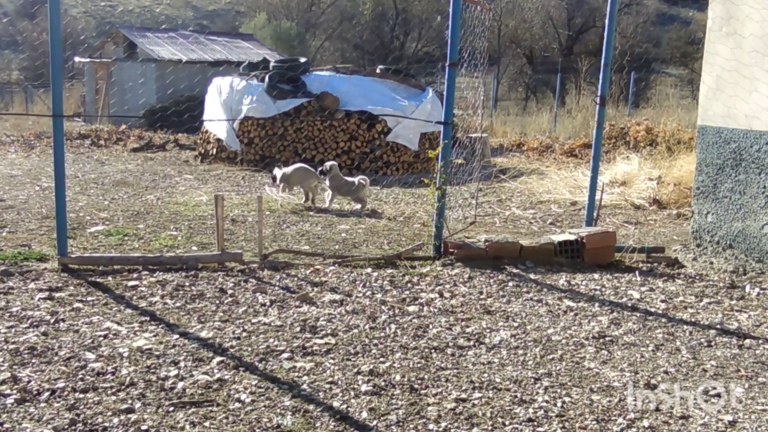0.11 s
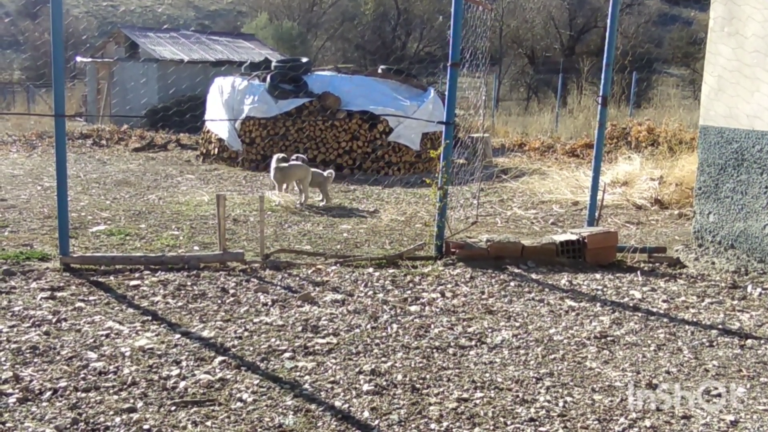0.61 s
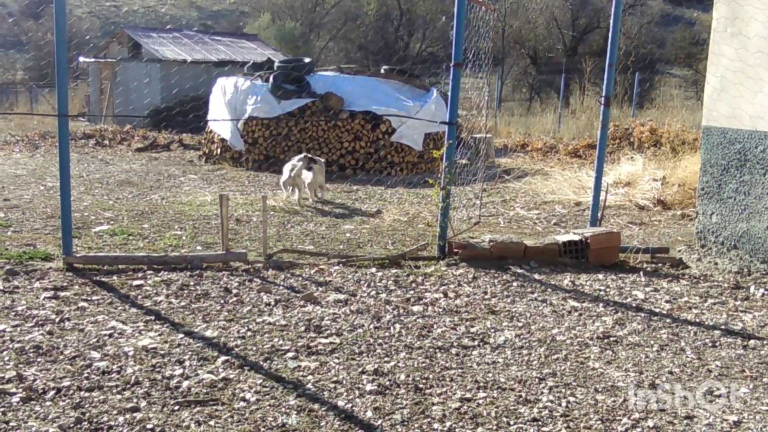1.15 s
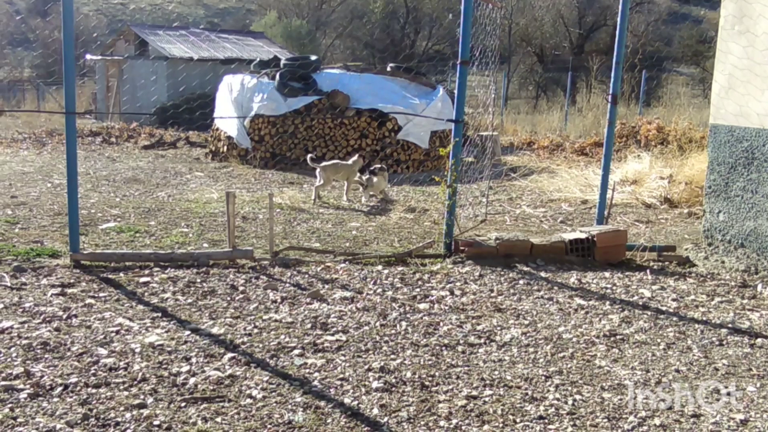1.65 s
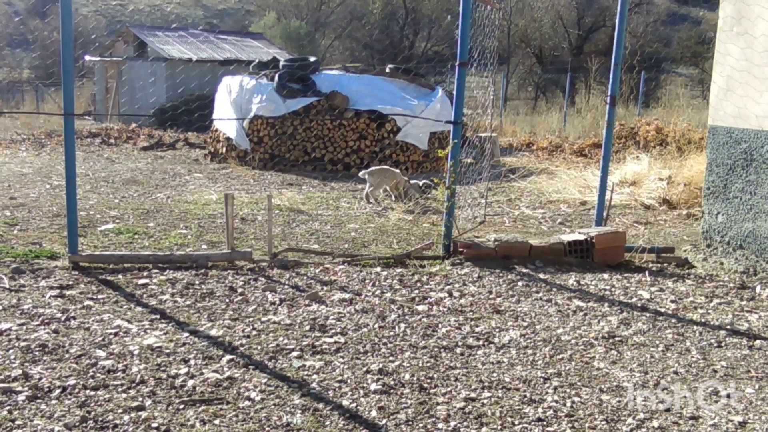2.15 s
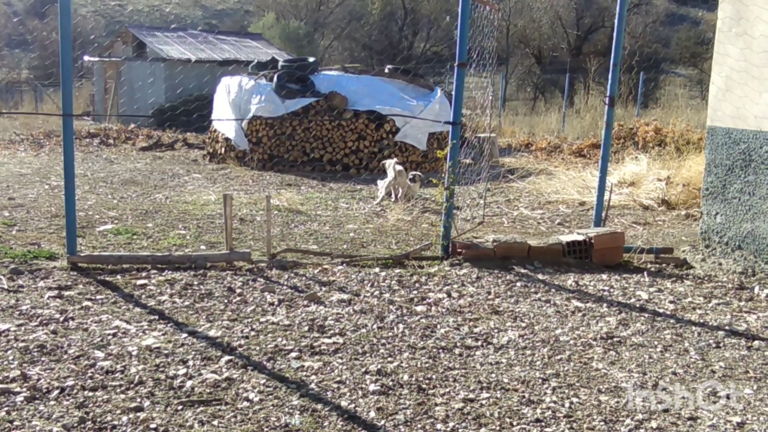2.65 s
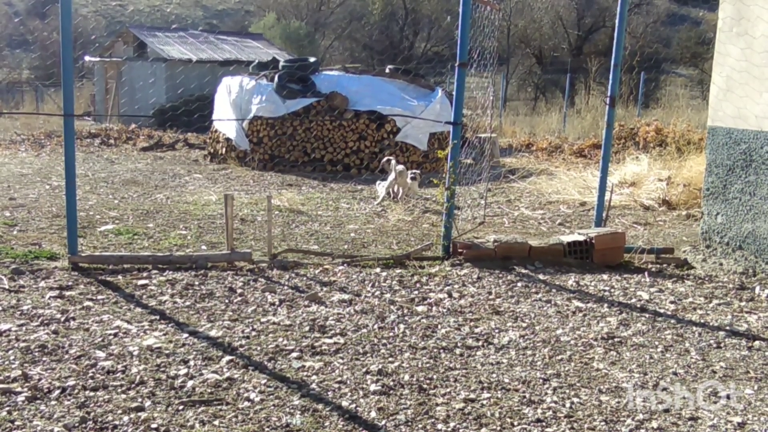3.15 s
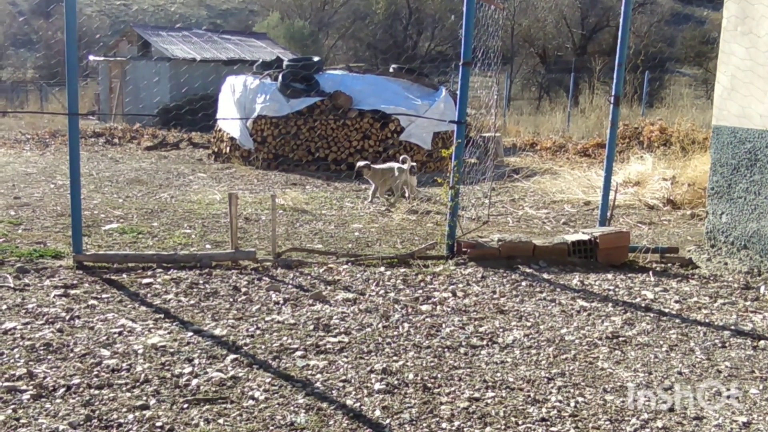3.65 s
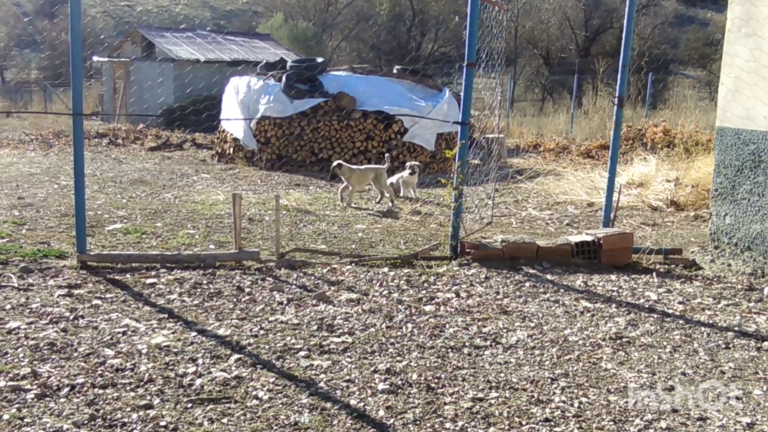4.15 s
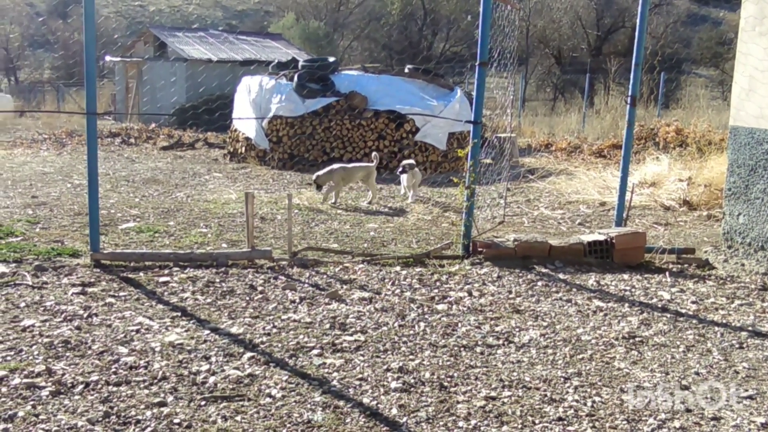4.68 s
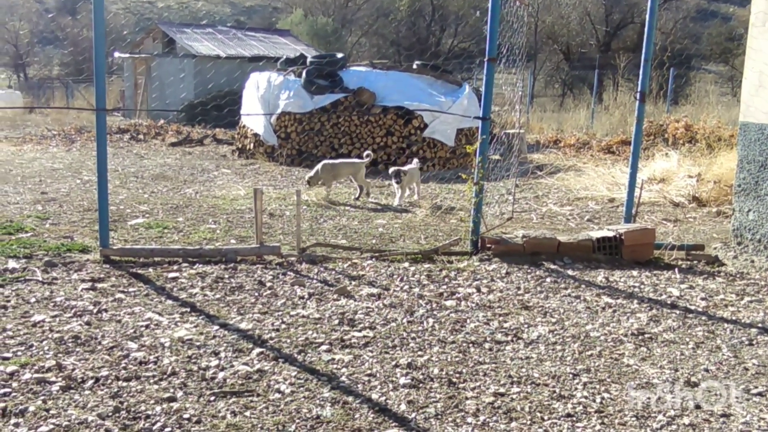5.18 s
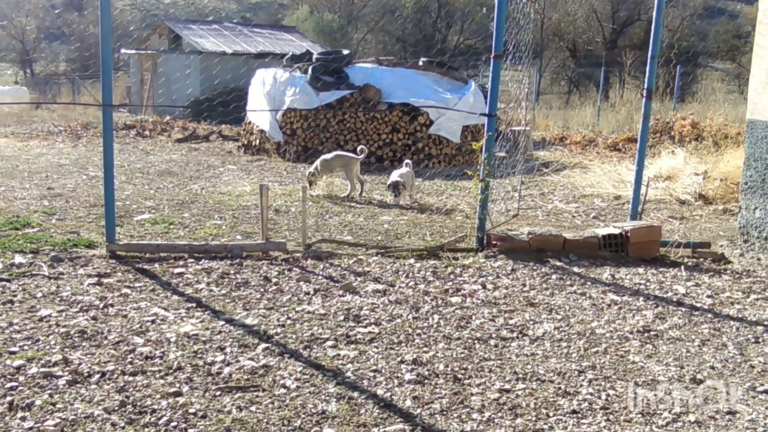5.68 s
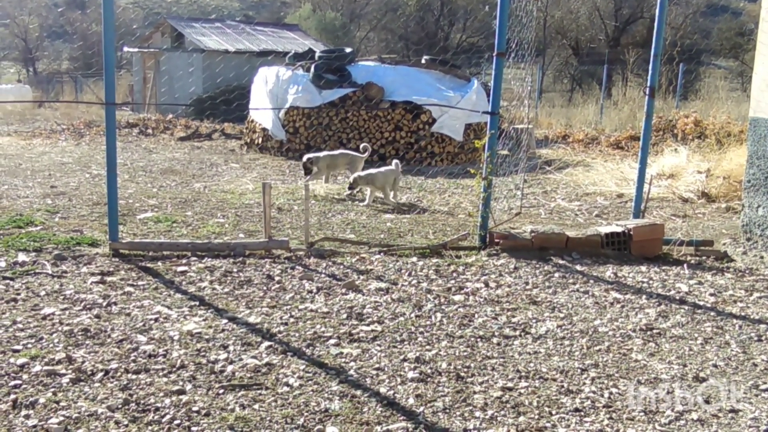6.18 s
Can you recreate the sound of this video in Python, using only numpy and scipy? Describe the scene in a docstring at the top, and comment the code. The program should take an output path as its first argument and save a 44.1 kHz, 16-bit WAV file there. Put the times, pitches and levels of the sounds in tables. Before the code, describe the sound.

An open yard heard in stereo from some metres away, with quiet hush, faint hiss, soft low wind and very short echoes. At 0-0.3 s a hoarse puppy growl starts amid dry litter crackles and snapping twigs, mostly to the left. Lower, weaker growls follow at 0.4-0.8 and 0.9-1.45 s. At 1.5 s comes one very short, loud, harsh yap. From 1.7 to 2.8 s the snarling is roughest and loudest, pulsing in bursts with hard throaty slaps, busy paws and bright snaps. It sinks to a low growl, gone by 3.2 s. Then there are brief faint grumbles, a clear snap at 3.55 s, scattered ticks and a wind bump at 4.5 s. A tiny falling chirp at 4.95 s precedes a downward-sliding insect hiss at 5.2 s. At 5.9 s a hard object bounces rapidly, with hollow scraping, renewed scuffling and soft grumbles to 6.3 s.

```python
"""An open yard with dry wood chips on the ground: two puppies wrestle some metres from a pair of microphone ports.
Low growls and one sharp yap are voiced by pulses, overtones and breath that ring resonances of the body.
Paws scuffle in the litter as dense random cracks; twigs snap, a hard thing bounces, something scrapes.
Then they calm down to faint grumbles and a few snaps, with an insect's sliding hiss, a bird's falling chirp and
light wind made of filtered noise. Dogs and single ground sounds also echo through the yard."""
import sys
import numpy as np
from scipy import signal
from scipy.fft import rfft, irfft, next_fast_len
from scipy.io import wavfile
from scipy.ndimage import uniform_filter1d

SR = 44100
rng = np.random.default_rng(int(sys.argv[2]) if len(sys.argv) > 2 else 0)


def master_out(mix):
    """Clip the mix to full scale and print it as 16-bit PCM to the path in sys.argv[1]."""
    frames = np.transpose(np.atleast_2d(mix))
    ceiling = np.clip(frames, -1, 1)
    pcm = np.round(ceiling * 32767).astype(np.int16)
    wavfile.write(sys.argv[1], SR, pcm)


def volts(x):
    """Linear amplitude factor 10**(x/20) for a level x in dB, scalar or array-like."""
    e = np.asarray(x, float) / 20
    return 10 ** e


N = 278006


def evened(x):
    """Normalization: scales a signal to rms 1."""
    return x / np.sqrt(np.mean(x ** 2) + 1e-20)


def read(points, hz):
    """Spectral envelope: interpolates a table on a log-frequency axis."""
    f, value = np.transpose(points)
    return np.interp(np.log(hz + 1), np.log(f + 1), value)


def curve(rows):
    """Control envelope: first sample of a timed table and its columns interpolated at audio rate."""
    s, *columns = np.transpose(rows)
    first = max(round(s[0] * SR), 0)
    end = min(round(s[-1] * SR), N)
    t = np.arange(first, end) / SR
    return round(t[0] * SR), [np.interp(t, s, c) for c in columns]


def add(mix, at, sound):
    """Superposition: mixes a sound in, in place, from sample at."""
    part = mix[..., at:at + sound.shape[-1]]
    part += sound[..., :part.shape[-1]]


def resonate(x, hz, width):
    """Heterodyne resonance: shifts hz down to zero, smooths twice, shifts back; its gain is 1."""
    turn = np.exp(2j * np.pi * np.cumsum(hz * np.ones(x.shape[-1])) / SR)
    r = np.exp(-np.pi * width / SR)
    return 2 * (turn * signal.lfilter([(1 - r) ** 2], [1, -2 * r, r ** 2], x / turn)).real


def colour(x, gain):
    """Linear filtering: multiplies the spectrum by a function of frequency."""
    size = next_fast_len(x.shape[-1])
    spectrum = rfft(x, size) * gain(np.fft.rfftfreq(size, 1 / SR))
    return irfft(spectrum, size)[..., :x.shape[-1]]


def wobble(size, hz):
    """Low-passed noise: a random drift of rms 1, about hz turns a second."""
    span = int(SR / hz / 2)
    return evened(uniform_filter1d(uniform_filter1d(rng.standard_normal(size), span), span))


def cavity(x, modes, hz=1):
    """Parallel resonances: a few modes (frequency, width_hz, level_db), shifted together by hz."""
    return evened(sum(volts(db) * resonate(x, f * hz, width) for f, width, db in modes))


def swell(t, peak_s, db, rise_s, fall_s):
    """Exponential envelope: level in dB that gains 10 dB in each rise_s and loses 10 dB in each fall_s."""
    return db - 10 * np.maximum((peak_s - t) / max(rise_s, .002), (t - peak_s) / max(fall_s, .002))


def loudest(levels_db):
    """Incoherent summation: adds levels as powers."""
    return 10 * np.log10(sum(volts(db) ** 2 for db in levels_db))


# effort and mouth movement, a list per growl: time_s, chest_level_db, mouth_opening (0-1), mouth_hz
GROWL_MOTION = [
    [(0.0, -43, 0.56, 950), (0.07, -46.5, 0.46, 1010), (0.11, -54.5, 0.53, 970), (0.18, -54.5, .48, 1110),
     (0.26, -72, 0.84, 1070)],
    [(0.42, -64, 0.6, 840), (0.46, -49.5, 0.12, 800), (0.56, -54, 0.39, 762), (0.612, -46.5, 0.45, 750),
     (0.73, -57.5, .33, 790), (0.78, -71, 0.7, 790)],
    [(0.92, -75, 0.76, 880), (0.99, -60, 0.55, 830), (1.02, -68, 0.28, 842), (1.085, -56, 0.5, 887),
     (1.118, -51, 0.81, 980), (1.166, -51, 0.61, 800), (1.258, -53.5, 0.98, 1073), (1.364, -58, 0.73, 997),
     (1.44, -52, 0.51, 1000), (1.47, -59.5, 0.5, 996)],
    [(1.45, -62.5, .01, 900), (1.494, -47, .01, 900), (1.566, -52.5, .01, 900), (1.6, -63, 0.08, 900),
     (1.68, -57, 0.2, 900), (1.71, -73, .01, 900)],
    [(1.69, -61.5, 1, 940), (1.71, -63, 1, 1050), (1.778, -41.5, 0.79, 893), (1.864, -41, 0.8, 767),
     (1.93, -43.5, 0.75, 910), (1.962, -43, 0.68, 1010), (2.01, -49.5, 0.36, 930)],
    [(2.0, -62, 0.5, 944), (2.026, -45, 0.76, 970), (2.058, -47, 0.84, 910), (2.092, -46.5, 0.76, 1174),
     (2.142, -49.5, 0.62, 960), (2.164, -57, 0.89, 905), (2.23, -65, 0.76, 860)],
    [(2.25, -46, 0.5, 920), (2.322, -46, 0.82, 924), (2.352, -42.5, 0.7, 885), (2.442, -44.5, 0.8, 930),
     (2.472, -41.5, 0.59, 950), (2.682, -47, 0.72, 920), (2.704, -43, 0.62, 860), (2.764, -50, 0.77, 890),
     (2.83, -57, 0.47, 900)],
    [(2.81, -46.5, 0.57, 875), (2.92, -49.5, 0.61, 860), (3.018, -57.5, 0.31, 844), (3.132, -52, .42, 876),
     (3.16, -61, 0.04, 860), (3.24, -79, 0.2, 853)],
    [(3.43, -70, .45, 770), (3.47, -65.5, 0.33, 790), (3.5, -66.5, 0.3, 760), (3.54, -85.5, .6, 780)],
    [(4.03, -77.5, 0.28, 800), (4.098, -65.5, 0.37, 750), (4.15, -85, .6, 730)],
    [(4.21, -72, .1, 750), (4.3, -63.5, 0.43, 830), (4.354, -69.5, 0.2, 782), (4.4, -69.5, .42, 786)],
]
# the folds, one row a growl: start_pitch_hz, end_pitch_hz, start_roughness, end_roughness (0 clear, 1 hoarse)
FOLDS = [(182, 170, .5, .58), (118, 108, .42, .34), (108, 112, .12, .45), (115, 115, .5, .5),
         (165, 180, .62, .62), (158, 136, .5, .58), (142, 130, .48, .4), (115, 111, .26, .08),
         (97, 90, .4, .3), (166, 163, .04, .04), (148, 138, .2, .2)]
# the tract, one row a growl: chest_hz, throat_hz, throat_above_chest_db, teeth_above_mouth_db
TRACTS = [(250, 477, -4, -4.5), (230, 507, -12.5, -6), (226, 467, -11, -1), (220, 240, 0.5, 0.5),
          (220, 440, -7, -8), (220, 474, -10, -5), (220, 435, -4, -8), (227, 410, -6.5, -7),
          (183, 440, -3, -4), (200, 533, 4.5, -2), (170, 305, 2.5, 4)]
# chest resonances: factor_on_chest_hz, width_hz, level_db
CHEST_MODES = [(.9, 170, 27.5), (1.4, 200, -8)]
# mouth resonances: factor_on_mouth_hz, width_hz, level_db
MOUTH_MODES = [(0.99, 330, 7.5), (1.5, 180, -3), (0.5, 120, 1), (.7, 240, -2.5)]
# resonances at the teeth: frequency_hz, width_hz, level_db
TEETH_MODES = [(2230, 910, 10), (1740, 1000, -2.5), (3130, 1900, -4.5)]
MOUTH_SHUT_DB, MOUTH_OPEN_DB = -30.5, 5.5  # the mouth's ring above the chest
PITCH_WAVER = .06  # rms share of the pitch at roughness 1


def growl(rows, start_hz, end_hz, rough_start, rough_end, chest_hz, throat_hz, throat_db, bared_db):
    """Source-filter principle: slack folds slap unevenly; chest, throat, mouth and teeth ring with each slap."""
    at, (chest_db, opening, mouth_hz) = curve(rows)
    size = len(chest_db)
    rough = np.linspace(rough_start, rough_end, size)
    hz = np.linspace(start_hz, end_hz, size) * (1 + PITCH_WAVER * rough * wobble(size, 12))
    mouth_db = MOUTH_SHUT_DB + (MOUTH_OPEN_DB - MOUTH_SHUT_DB) * opening
    jitter = np.clip(1 + .36 * rough * wobble(size, 90), .3, 3)
    turns = np.cumsum(hz * jitter) / SR
    strength = volts(6 * rough * rng.standard_normal(size).clip(-2, 2))
    slaps = evened(np.diff(np.floor(turns), prepend=0) * strength)
    # breath bursts out at each opening
    puffs = rough * evened(np.exp(-(turns % 1) / 2.4) * rng.standard_normal(size))
    flap = volts(4.6 * rough * wobble(size, 71))  # loose lips and cheeks flutter
    deep = np.sqrt(flap) * (slaps + 1.0 * puffs)
    hoarse = flap * (slaps + 3.0 * puffs)
    throat = volts(throat_db) * evened(resonate(deep, throat_hz, 200))
    low = cavity(deep, CHEST_MODES, chest_hz) - throat  # in opposite polarity
    voice = evened(low) + volts(mouth_db) * cavity(deep + hoarse, MOUTH_MODES, mouth_hz)
    voice += volts(mouth_db + bared_db) * cavity(hoarse, TEETH_MODES)  # breath is harshest at the teeth
    # a small body radiates no deep bass
    voice = colour(voice, lambda f: 1 / np.hypot(1, (122 / (f + 1)) ** 4))
    return at, volts(chest_db) * voice * signal.windows.tukey(size, .04)


# single slaps that stand out of the growls: start_s, level_db (mouth ring before its decay), ringing_hz
SINGLE_SLAPS = [(1.728, -36, 980), (1.745, -37, 920), (1.798, -33, 935), (1.835, -27.5, 787),
                (1.851, -30, 767), (2.355, -34, 977), (2.462, -31, 870), (2.511, -41.5, 900),
                (2.566, -40.5, 1003), (2.65, -44, 920), (2.825, -46, 906)]


def hard_slaps():
    """Impulse response: each slap rings the mouth for a few cycles and thumps the throat."""
    out, t = np.zeros(N), np.arange(1500) / SR
    for s, db, hz in SINGLE_SLAPS:
        mouth = np.sin(2 * np.pi * hz * t) * np.exp(-t / 0.0081)
        throat = .5 * np.sin(2 * np.pi * 330 * t) * np.exp(-t / 0.0054)
        add(out, round(s * SR), volts(db) * (mouth + throat) * np.minimum(t / 0.0012, 1))
    return out


# time_s, voice_level_db, squeal_share (0-1), squeal_hz
YAP_MOTION = [(1.468, -56.5, 1, 1043), (1.485, -36, 0.54, 1151), (1.495, -30, 1, 1055),
              (1.505, -18, 0.77, 971.5), (1.518, -21, .09, 995.5), (1.532, -17, .05, 1159),
              (1.543, -20.5, 0.5, 1121), (1.556, -22.5, .74, 913), (1.566, -32.5, 0.82, 976),
              (1.59, -58.5, 0.9, 928)]
# spectral envelope of overtones and breath: frequency_hz, level_db
YAP_TRACT = [(150, -66), (250, -14.5), (579, -10), (901, -3), (1500, -17.5), (2290, -16), (2690, -18),
             (3050, -29), (3930, -41), (4750, -54), (5930, -57.5), (8950, -36.5), (11000, -59),
             (14300, -86.5), (22000, -120)]
# breath: peak_level_db, rise_db_per_s, sag_db_per_s, further_fall_after_the_end_db_per_s
YAP_BREATH = (-28.5, 1098.5, 110, 500)
BREATH_PEAK_S, BREATH_END_S = 1.496, 1.566
YAP_START_HZ, YAP_HOLD_HZ, YAP_RISE_S = 257, 293.3, .03  # the pitch climbs and settles
YAP_SHIMMER_DB = 4.5  # rms; each overtone flickers on its own


def yap():
    """Biphonation: overtones without their fundamental, an unrelated squeal near 1 kHz, and harsh breath."""
    at, (effort_db, share, squeal_hz) = curve(YAP_MOTION)
    share = np.clip(share, 0, 1)
    size = len(share)
    t = np.arange(size) / SR
    hz = YAP_HOLD_HZ - (YAP_HOLD_HZ - YAP_START_HZ) * np.exp(-(t / YAP_RISE_S) ** 2)
    peak_db, rise, sag, fall = YAP_BREATH
    s = t + at / SR
    breath_db = peak_db - np.maximum(rise * (BREATH_PEAK_S - s), sag * (s - BREATH_PEAK_S))
    breath_db = breath_db - fall * np.maximum(s - BREATH_END_S, 0)
    turns = np.cumsum(hz * (1 + .018 * wobble(size, 250))) / SR
    clean = np.zeros(size)
    for k in range(2, 36):
        overtone_db = read(YAP_TRACT, k * hz) + YAP_SHIMMER_DB * wobble(size, 43)
        clean += volts(overtone_db) * np.cos(2 * np.pi * k * turns + k * k * 0.24)
    squeal = np.sin(2 * np.pi * np.cumsum(squeal_hz * (1 + .04 * wobble(size, 200))) / SR)
    squeal *= 1 + .3 * np.cos(2 * np.pi * turns)  # the folds chop it, giving sidebands
    breath = colour(rng.standard_normal(size),
                    lambda f: volts(read(YAP_TRACT, f)) / np.hypot(1, (600 / (f + 1)) ** 3))
    voice = np.sqrt(1 - share) * evened(clean) + np.sqrt(share) * evened(squeal)
    return at, volts(effort_db) * voice + volts(breath_db) * evened(breath)


# faint low sounds that swell and fade: peak_s, level_db, centre_hz
GRUMBLE_SWELLS = [(0.88, -61, 289.8), (3.269, -67, 310), (3.49, -73, 220), (3.68, -69, 239),
                  (4.09, -67, 330), (4.311, -64.5, 280), (4.6, -61.5, 275.7), (4.88, -63.5, 300),
                  (5.08, -66, 305), (5.4, -67.5, 275.2), (5.77, -82.5, 250), (5.92, -61.5, 243.5),
                  (6.03, -63, 272), (6.14, -65.5, 273), (6.26, -61, 270.4)]
GRUMBLE_RISE_S, GRUMBLE_FALL_S = 0.056, 0.054  # over 10 dB
GRUMBLE_VOICED = 1.2  # pulses at half the resonance, against breath


def grumbles():
    """Source-filter principle: soft pulses and breath drive a low resonance tuned anew for each swell."""
    t = np.arange(N) / SR
    peak_s, _, peak_hz = np.transpose(GRUMBLE_SWELLS)
    level_db = loudest([swell(t, s, db, GRUMBLE_RISE_S, GRUMBLE_FALL_S) for s, db, _ in GRUMBLE_SWELLS])
    nearest = np.round(np.interp(t, peak_s, np.arange(len(peak_s)))).astype(int)
    hz = peak_hz[nearest]
    turns = np.cumsum(hz / 2 * (1 + 0.0326 * wobble(N, 44))) / SR
    pulses = evened(np.diff(np.floor(turns), prepend=0))
    drive = (rng.standard_normal(N) + GRUMBLE_VOICED * pulses) * volts(1.1 * wobble(N, 30))
    voice = evened(resonate(drive, hz, 104)) + .5 * cavity(drive, CHEST_MODES, 190)
    return volts(level_db) * evened(voice)


# paws busy in the litter: time_s, level_db
PAW_LEVEL = [(0.0, -51.5), (0.3, -58), (0.42, -61.5), (0.77, -69), (0.92, -67.5), (1.05, -58), (1.19, -58),
             (1.44, -64.5), (1.68, -63.5), (1.78, -51), (2.2, -56.5), (2.47, -57), (2.55, -65.5),
             (2.8, -74.5), (3.14, -81.5), (3.6, -80.5), (5.5, -74.5), (6.3, -66.5)]
# single kicks into the litter: peak_s, level_db, rise_s, fall_s (both over 10 dB)
PAW_KICKS = [(0.0, -44, .01, 0.016), (0.07, -45, 0.046, 0.036), (0.21, -50, 0.021, 0.062),
             (0.52, -55.5, 0.019, 0.14), (0.819, -52.5, 0.042, 0.046), (0.95, -55, 0.014, .05),
             (1.02, -58, .05, 0.093), (1.28, -76, 0.09, 0.028), (1.52, -59.5, .03, .04),
             (1.79, -47.5, 0.062, 0.053), (2.09, -49.5, 0.057, 0.044), (2.16, -47, 0.046, 0.023),
             (2.25, -58, .03, 0.044), (2.35, -55, 0.039, 0.12), (3.19, -60.5, 0.025, .05),
             (3.56, -58, .017, 0.025), (3.7, -59.5, 0.0072, .033), (3.831, -63.5, .065, 0.052),
             (3.98, -71.5, .1, .15), (4.53, -73.5, .2, .07), (4.609, -72, .008, .036),
             (5.6, -66.5, .012, 0.038), (5.93, -62, 0.024, 0.069), (6.04, -58, 0.11, 0.045)]
# spectrum of the dry litter, also used by the snaps: frequency_hz, density_db_per_hz
LITTER_SPECTRUM = [(880, -53), (1500, -16), (2250, -15.5), (3470, -14.5), (4350, -15.5), (6080, -6.5),
                   (6910, -6.5), (9190, 1.5), (13000, -14), (15800, -10)]


def scuffle():
    """Random impulse train: thousands of tiny cracks a second, in clumps, a few of them large."""
    t = np.arange(N) / SR
    steady_db = np.interp(t, *np.transpose(PAW_LEVEL))
    level_db = loudest([steady_db] + [swell(t, *kick) for kick in PAW_KICKS])
    cracks = rng.standard_normal((3, N)) * volts(np.minimum(rng.exponential(1, (3, N)), 5))
    cracks *= rng.random((3, N)) < 6000 / SR  # cracks a second
    # one stream is shared by both channels, the others belong to one each
    both = colour(cracks[0] + 0.64 * cracks[1:], lambda f: volts(read(LITTER_SPECTRUM, f)))
    clumped = evened(both * volts(2 * wobble(N, 43)))
    return clumped * volts(level_db) * volts([[-1.5], [1.5]])


# twigs and chips snapping: start_s, bright_peak_db, woody_above_bright_db, left_minus_right_db
TWIGS = [(0.0556, -38.5, -20, 22.5), (0.17, -50, -10, 6), (0.2136, -33.5, -24, 11), (0.59, -47, -14, 11),
         (0.7829, -50, 3.5, 5), (0.7964, -39, -26, 12), (0.812, -43, -33, -13), (0.8265, -40, -26, 5),
         (0.9322, -46, -40, 14.5), (0.9436, -34.5, -40, 3), (0.9596, -43.5, -36, 1),
         (1.019, -45.5, -37, 9.5), (1.071, -49.5, -19, -13), (1.094, -49, -9, 17), (1.2727, -40, -20, -1),
         (1.711, -43, -25, 6), (1.736, -40.5, -13, 1), (1.7496, -36, -21, -10), (1.7964, -33.5, -26, -1),
         (1.9185, -43.5, -12, -2), (2.0499, -30, -18, 1.5), (2.0813, -32.5, -16, 4), (2.1535, -38.5, -9, 4),
         (2.3313, -48, -14, -3.0), (2.3481, -46, -19, -1), (2.4672, -45, -9, -13.5),
         (3.553, -36.5, -13.5, 7), (3.705, -54, -19, 6.5), (3.8121, -45, -8, 3.5), (3.849, -49, -24.5, 0),
         (3.9717, -46, -29.5, -7), (4.0172, -53, -11, 0.5), (4.612, -48, -30, -14),
         (5.0407, -52, -21.5, -0.5), (5.4827, -61.5, -0.5, -2.5), (5.601, -44.5, -14, 2.5),
         (5.9155, -51.5, 6, -18.5)]


def snaps():
    """Transient fracture: a 2 ms bright burst with a short crackling tail and a duller woody tick."""
    out, t = np.zeros((2, N)), np.arange(1800) / SR
    shape = np.minimum(t / 0.000095, 1) * (np.exp(-t / 0.0022) + .15 * np.exp(-t / 0.014))
    for s, db, wood_db, pan_db in TWIGS:
        noise = rng.standard_normal((4, len(t)))
        bright = colour((noise[0] + 0.84 * noise[2:]) * shape, lambda f: volts(read(LITTER_SPECTRUM, f)))
        wood = resonate(noise[1] * shape, 1600, 1830)
        snap = bright / abs(bright).max() + volts(wood_db) * wood / abs(wood).max()
        add(out, round(s * SR), volts(db + pan_db * np.array([[.5], [-.5]])) * snap)
    return out


# a hard thing drops and bounces: start_s, ring_peak_db
BOUNCES = [(5.9147, -36), (5.9198, -38), (5.9285, -43)]
# modes of the hard thing: frequency_hz, level_db, t60_s
BOUNCE_MODES = [(200, 7, 0.032), (526, 10, 0.033), (800, 9, 0.017), (1180, 13.5, 0.027), (2237, 15, 0.04),
                (5150, 5.5, 0.018)]


def knock():
    """Modal excitation: every bounce is a short crack of noise beside the same decaying modes."""
    out, t = np.zeros(N), np.arange(4000) / SR
    ring = sum(volts(db - 60 * t / t60) * np.sin(2 * np.pi * hz * t) for hz, db, t60 in BOUNCE_MODES)
    for s, db in BOUNCES:
        noise = rng.standard_normal(len(t))
        crack = colour(noise * np.exp(-t / 0.0066), lambda f: 1 / np.hypot(1, (f / 2700) ** 2))
        add(out, round(s * SR), volts(db) * (ring / abs(ring).max() + 0.34 * crack / abs(crack).max()))
    return out


# something drags or taps on the ground: peak_s, level_db, rise_s, fall_s (both over 10 dB), centre_hz
DRAGS = [(4.309, -66, 0.042, 0.033, 1204), (5.771, -62.5, .005, 0.0092, 645),
         (5.94, -67, 0.0055, 0.051, 1252), (6.05, -60.5, 0.089, 0.12, 1288),
         (6.211, -70.5, .05, 0.12, 1030)]
UPPER_DB = -2  # limit for a long fall; short taps excite the upper resonances less


def scrape(peak_s, db, rise_s, fall_s, hz):
    """Friction noise: dense grit excites a hollow resonance, its upper neighbour and a broad one."""
    t = np.arange(peak_s - .3, peak_s + .3, 1 / SR)
    grit = rng.standard_normal(len(t)) * volts(1.5 * wobble(len(t), 110))
    upper = volts(UPPER_DB) * min(fall_s / 0.18, 1)
    body = resonate(grit, hz, 360)
    body = body + upper * (resonate(grit, 1.54 * hz, 550) + 0.84 * resonate(grit, 1046, 1850))
    level = volts(swell(t, peak_s, db, rise_s, fall_s))
    return round(t[0] * SR), level * evened(body) * signal.windows.tukey(len(t), .1)


# level_db, rise_s, fall_s (both over 10 dB), centre_hz, slide_hz_per_s
INSECT_BUZZ = (-66, .14, .1, 7050, -1500)


def insect():
    """Narrow-band noise: a buzzing hiss in one resonance that slides down."""
    peak_s = 5.235
    db, rise_s, fall_s, hz, slide = INSECT_BUZZ
    t = np.arange(peak_s - .14, peak_s + .08, 1 / SR)
    buzz = rng.standard_normal(len(t)) * volts(1.6 * wobble(len(t), 100))
    hiss = evened(resonate(buzz, hz + slide * (t - peak_s), 650))
    return round(t[0] * SR), volts(swell(t, peak_s, db, rise_s, fall_s)) * hiss


# one faint falling chirp: length_s, level_db (before its fades), start_pitch_hz, slide_hz_per_s
BIRD_CHIRP = (.05, -75, 3300, -15000)


def bird():
    """Linear frequency sweep: a short sliding sine."""
    start_s = 4.94
    length, db, hz, slide = BIRD_CHIRP
    t = np.arange(0, length, 1 / SR)
    chirp = evened(np.sin(2 * np.pi * (hz + slide * t / 2) * t))
    return round(start_s * SR), volts(db) * chirp * np.hanning(len(t))


# the dogs, off to one side: frequency_hz, left_minus_right_db
DOGS_SIDE = [(100, 3), (500, 0.5), (1000, 5), (2500, 5), (6000, -8.5), (9000, -6), (13000, 0)]
PORT_LAG = 4.08  # samples by which the dogs reach the right port later


def ports(x):
    """Interchannel level and time difference: the two microphone ports differ in colour and arrival."""
    side = np.array([[.5], [-.5]])
    return colour(x, lambda f: volts(side * read(DOGS_SIDE, f)) * np.exp(2j * np.pi * f * side * PORT_LAG / SR))


# off the ground, woodpile, wall and shed, before the treble loss: delay_s, level_db, left_minus_right_db
YARD_ECHOES = [(.0011, -19.5, -2), (.0023, -17.5, -2.5), (.006, -28.5, -3.5), (.028, -11, -1),
               (0.076, -21, -4), (0.113, -31, 14.5), (0.16, -36, -4.5)]
YARD_T60, YARD_DB = 0.11, -8  # (s), (dB, scatter alone before the treble loss)


def yard(x):
    """Reflection and scattering: single echoes and a thin scatter from ground and trees, unlike in each ear."""
    size = SR // 2
    taps = np.zeros((2, size))
    at = np.arange(300, size - 20, 20) + rng.integers(0, 20, (2, (size - 301) // 20))
    np.put_along_axis(taps, at, rng.choice([-1., 1.], at.shape), 1)
    taps *= volts(-60 * np.arange(size) / SR / YARD_T60)
    taps *= volts(YARD_DB) / np.linalg.norm(taps[0])
    for s, db, pan_db in YARD_ECHOES:
        add(taps, round(s * SR), volts(db + pan_db * np.array([[.5], [-.5]])))
    echoed = signal.fftconvolve(x[None], taps, axes=1)[:, :N]
    return colour(echoed, lambda f: 1 / np.hypot(1, f / 2500))


# spectrum of the hush: frequency_hz, density_db_per_hz
HUSH_SPECTRUM = [(41, -34), (70, -0.5), (260, -0.5), (312, -3.5), (374, -4.5), (905, -11.5), (1010, -13),
                 (1300, -12.5), (1590, -15.5), (2620, -15.5), (3440, -20), (9330, -20.5), (15700, -30.5)]
# coherence of the hush: frequency_hz, left_right_likeness (0-1)
LIKENESS = [(60, 0.032), (130, 0.12), (290, 0.14), (640, 0.084), (1410, 0.018), (3100, 0.029), (6820, 0.24),
            (15000, 0.46)]
# gusts: peak_s, level_db
WIND_GUSTS = [(0.58, -57), (0.86, -56), (1.6, -51), (2.67, -56), (3.729, -51), (3.95, -54), (4.16, -54),
              (4.49, -42.5), (4.68, -55.5), (5.58, -54.5), (5.75, -52)]
AIR_DB = -65.5
WIND_DB, WIND_SWAY_DB = -58, 1.5  # breeze on the microphones and the rms of its random sway
GUST_RISE_S, GUST_FALL_S = 0.066, 0.04  # over 10 dB


def air():
    """Partial coherence: outdoor hush and microphone hiss, partly shared, and lumpy wind each port feels alone."""
    left, other = rng.standard_normal((2, N))
    right = colour(left, lambda f: np.clip(read(LIKENESS, f), 0, 1) ** .5)
    right = right + colour(other, lambda f: (1 - np.clip(read(LIKENESS, f), 0, 1)) ** .5)
    hush = evened(colour(np.array([left, right]), lambda f: volts(read(HUSH_SPECTRUM, f))))
    hush *= volts(AIR_DB) * volts(0.27 * wobble(N, 6))  # it swells a little
    rumble = colour(rng.standard_normal((2, N)),
                    lambda f: (f / 9) / (1 + (f / 9) ** 2.5) / np.hypot(1, (f / 60) ** 2))
    t = np.arange(N) / SR
    breeze_db = WIND_DB + WIND_SWAY_DB * wobble(N, 2)
    level_db = loudest([breeze_db] + [swell(t, s, db, GUST_RISE_S, GUST_FALL_S) for s, db in WIND_GUSTS])
    return hush + volts(level_db) * evened(rumble)


def scene():
    """Superposition: dogs and ground sounds, direct and through the yard, over the air."""
    dogs = hard_slaps() + grumbles()
    near = knock()
    for rows, folds, tract in zip(GROWL_MOTION, FOLDS, TRACTS):
        add(dogs, *growl(rows, *folds, *tract))
    add(dogs, *yap())
    for row in DRAGS:
        add(near, *scrape(*row))
    add(near, *insect())
    add(near, *bird())
    return ports(dogs) + yard(dogs + near) + near + scuffle() + snaps() + air()


def top_cut(x):
    """Nothing passes above the cut-off."""
    return signal.sosfilt(signal.butter(12, 16430, fs=SR, output="sos"), x)


def record(dry):
    """Band limitation: nothing from 15.8 kHz up passes."""
    mix = colour(dry, lambda f: f < 15800)
    return top_cut(mix)


dry = scene()
out = record(dry)
master_out(out)
```